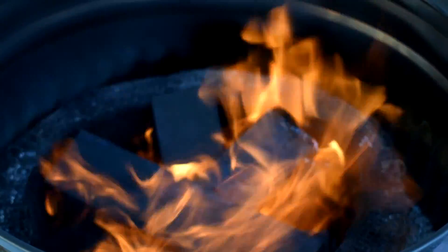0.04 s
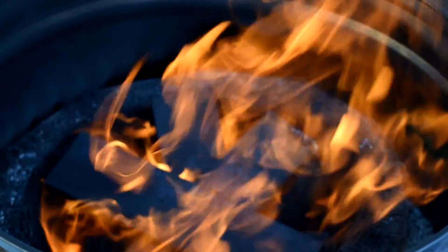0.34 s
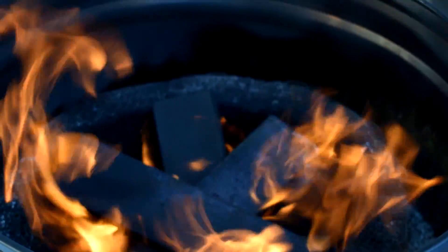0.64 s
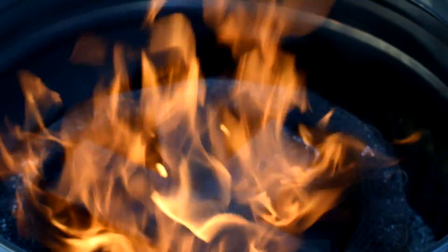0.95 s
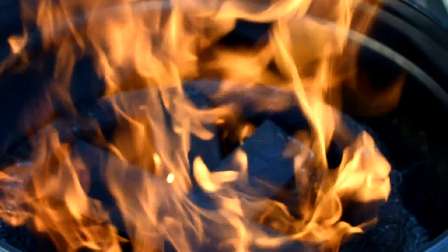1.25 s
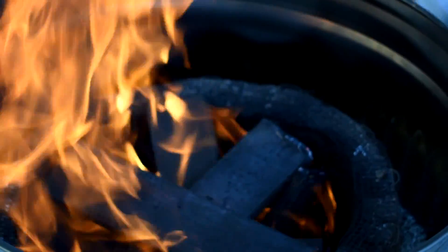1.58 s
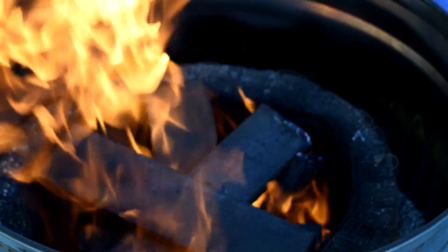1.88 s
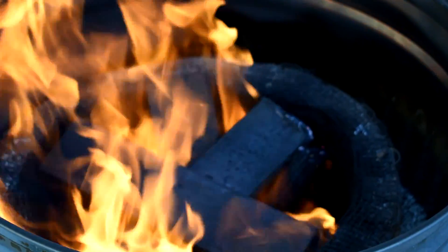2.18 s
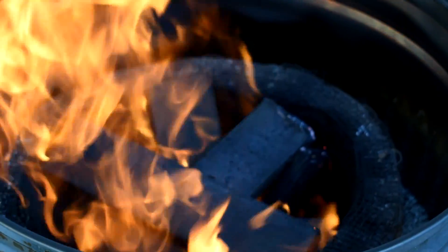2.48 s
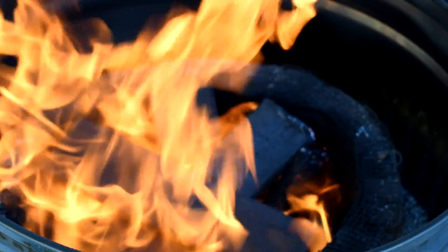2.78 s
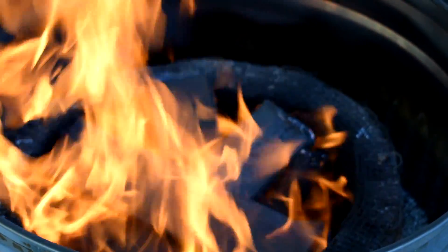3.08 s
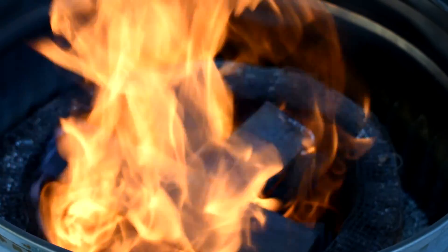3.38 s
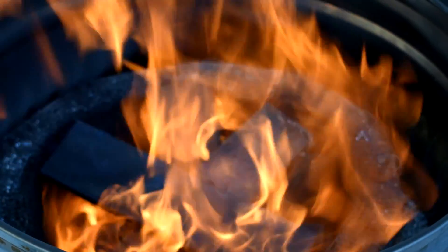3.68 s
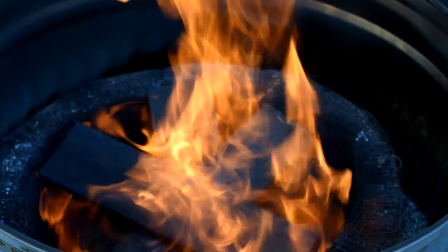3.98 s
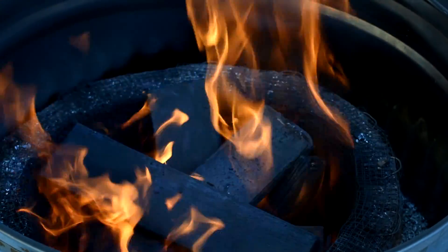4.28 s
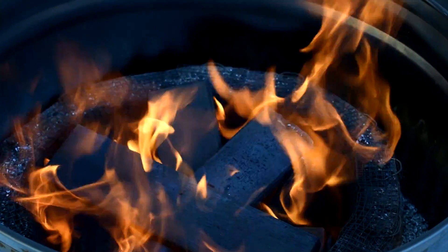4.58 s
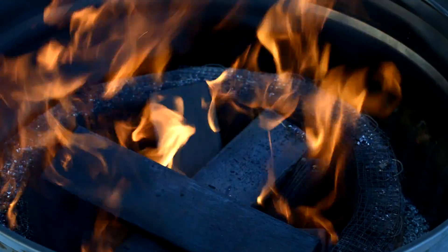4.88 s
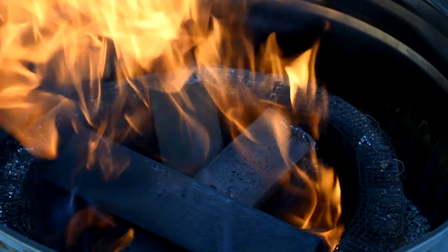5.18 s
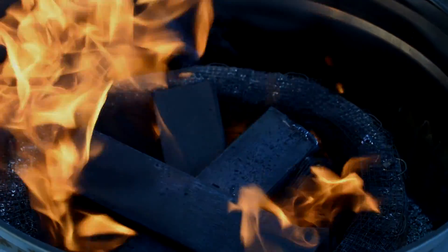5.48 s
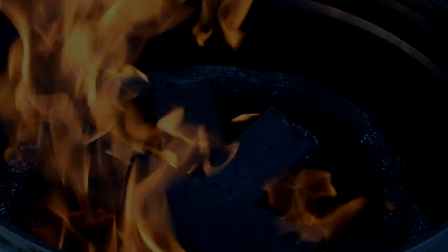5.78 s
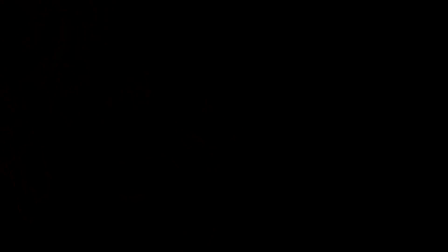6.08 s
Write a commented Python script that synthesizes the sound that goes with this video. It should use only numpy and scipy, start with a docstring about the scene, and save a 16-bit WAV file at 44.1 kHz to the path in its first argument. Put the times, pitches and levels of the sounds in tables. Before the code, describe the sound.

A close fire of coals rumbles and flutters softly inside a round metal furnace. Brittle crackles and snaps come at random over the flames, along with a thin hiss and small spits of gas. From about the middle on, a few pieces crack loudly with a brief hollow knock, the strongest near the end. The crackling spreads across the stereo field, and everything fades out at the close.

```python
"""Coals tick, snap and shed crumbs over a low rumble of flame: charcoal in an open metal furnace.
Each brittle fracture is an impulse coloured by the piece that broke, and the furnace wall scatters
it into a short, bright tail. The strongest cracks make whole blocks knock. Turbulent flames flutter
and flap; escaping gas hisses, spits, puffs and whistles thinly. The sound fades out at the end."""
import sys
import numpy as np
from scipy import signal
from scipy.fft import rfft, irfft, next_fast_len
from scipy.io import wavfile
from scipy.ndimage import map_coordinates

SR = 44100
rng = np.random.default_rng(int(sys.argv[2]) if len(sys.argv) > 2 else 0)


def materialize(psi):
    """Save the field psi as 16-bit PCM at rate SR to the path in sys.argv[1].

    A 1-D psi becomes a single channel; in a 2-D psi each row is a channel.
    """
    bounded = np.clip(np.atleast_2d(psi).T, -1, 1)
    quanta = np.round(bounded * 32767).astype(np.int16)
    wavfile.write(sys.argv[1], SR, quanta)


N = 275625
TIME_S = np.arange(N) / SR
TOP_HZ = 15750  # upper band limit


def amp(db):
    """Decibels to amplitude ratio."""
    return 10 ** (np.asarray(db) / 20)


def unit(x):
    """Normalisation to rms 1."""
    return x / np.sqrt(np.mean(x ** 2) + 1e-20)


def along(points, hz):
    """Interpolation of (frequency_hz, value) points on a logarithmic frequency axis."""
    knot_hz, values = np.transpose(points)
    return np.interp(np.log(hz + 1), np.log(knot_hz + 1), values)


def wobble(per_s):
    """Slow random modulation: a spline through per_s Gaussian values a second."""
    knots = rng.standard_normal(int(N * per_s / SR) + 4)
    return map_coordinates(knots, [TIME_S * per_s])


def filtered(x, response):
    """Linear filtering: the spectrum of x is multiplied by response(hz)."""
    size = next_fast_len(x.shape[-1] + 8192)
    hz = np.fft.rfftfreq(size, 1 / SR)
    return irfft(rfft(x, size) * response(hz), size)[..., :x.shape[-1]]


def minimum_phase(gain_db):
    """Causality: a response with these gains that rings only after the blow."""
    cepstrum = irfft(np.log(amp(gain_db)))
    half = cepstrum.shape[-1] // 2
    cepstrum[..., 1:half] *= 2
    cepstrum[..., half + 1:] = 0
    return np.exp(rfft(cepstrum))


# Likeness of left and right: frequency_hz, correlation
COHERENCE = [(200, 1), (450, 0.98), (800, 0.92), (1300, 0.73), (2000, 0.75), (3000, 0.94), (4500, 0.48),
             (5600, 0.22), (7500, -0.17), (12500, 0.16), (15000, -0.29)]
def spread(pair, hz):
    """Partial coherence: two independent spectra mix to stereo, alike in the bass, apart in the treble."""
    angle = np.arccos(np.clip(along(COHERENCE, hz), -1, 1)) / 2
    mid, side = pair[0] * np.cos(angle), pair[1] * np.sin(angle)
    return np.array([mid + side, mid - side])


def coloured_noise(spectrum):
    """Spectral shaping of white noise, in stereo at rms 1."""
    size = next_fast_len(N)
    hz = np.fft.rfftfreq(size, 1 / SR)
    white = spread(rfft(rng.standard_normal((2, size))), hz)
    return unit(irfft(white * amp(along(spectrum, hz)), size)[:, :N])


# Colour of the wall's reflections, also given to the gas spits: frequency_hz, gain_db
WALL_SPECTRUM = [(200, -14), (1000, -8.5), (3000, -0.5), (9000, 0.5), (12000, -5), (15000, -10.5)]
def furnace_wall(incident, t60_s=0.27, rise_s=0.00077, size=16384):
    """Reverberation: the round metal wall scatters each crack into a short, bright tail."""
    t = np.arange(size) / SR
    tail = filtered(rng.standard_normal((2, size)), lambda hz: amp(along(WALL_SPECTRUM, hz)))
    tail = tail * amp(-60 * t / t60_s) * (1 - np.exp(-t / rise_s))
    return signal.fftconvolve(incident, tail / np.linalg.norm(tail[0]), axes=1)[:, :N]


def gas_whistle(start_s=1.4, rise_s=0.6, level_db=-69.5, pitch_hz=14000, sag_hz_per_s=190, waver_hz=70):
    """Flow tone: gas sings in a slowly widening crack, a narrow noise band that wavers and sinks."""
    age_s = TIME_S - start_s
    swell = np.clip(age_s / rise_s, 0, 1)
    centre_hz = pitch_hz - sag_hz_per_s * age_s + waver_hz * wobble(8)
    phase = 2 * np.pi * np.cumsum(centre_hz) / SR
    band = np.array([wobble(450) * np.sin(phase) + wobble(450) * np.cos(phase) for _ in range(2)])
    return swell * amp(level_db + wobble(4.6)) * unit(band)


# Colour of the seeping gas: frequency_hz, density_db
HISS_SPECTRUM = [(300, -23), (1000, -3), (3000, -2.5), (5500, -0.5), (8000, 0), (11000, 0.5), (12500, 1.5),
                 (14000, 3), (16000, 2)]
# Strength of the gas flow, the base level for hiss and ticks: time_s, level_db
GAS_FLOW = [(0, -54), (1.5, -53.5), (1.7, -52.5), (2.05, -56), (2.33, -50.5), (2.5, -55), (3.05, -54),
            (3.25, -51.5), (3.62, -55), (4.05, -53), (5.3, -55), (5.7, -55.5)]
def gas_hiss(offset_db=-0.6, sputter_db=0.77, split_hz=7000):
    """Flow noise: gas seeps from hot coals, its coarse and fine hiss each wavering at its own pace."""
    flow_db = np.interp(TIME_S, *np.transpose(GAS_FLOW))
    hiss = coloured_noise(HISS_SPECTRUM)
    fine = filtered(hiss, lambda hz: hz ** 4 / (hz ** 4 + split_hz ** 4))
    coarse = hiss - fine
    seep = coarse * amp(1.7 * wobble(25)) + fine * amp(1.2 * wobble(21))
    return amp(flow_db + offset_db + sputter_db * wobble(340)) * seep


# Jets of gas from fresh cracks: start_s, level_db, t60_s
GAS_SPITS = [(1.69, -53, 0.15), (2.549, -53, 0.3), (4.193, -55, 0.076), (4.458, -52.5, 0.53),
             (4.503, -48, 0.026), (4.712, -48, 0.14), (5.36, -46, 0.22)]
def gas_spits(rise_s=0.0018):
    """Transient jet noise: gas rushes from a fresh crack and dies away exponentially."""
    envelope = np.zeros(N)
    for start_s, level_db, t60_s in GAS_SPITS:
        age_s = np.maximum(TIME_S - start_s, 0)
        envelope += amp(level_db - 60 * age_s / t60_s) * np.minimum(age_s / rise_s, 1)
    return envelope * coloured_noise(WALL_SPECTRUM)


# Colour of the body of the flames: frequency_hz, density_db
RUMBLE_SPECTRUM = [(20, -30), (48, -15), (62, -12.5), (80, 1), (130, 0.5), (175, -1), (260, -7.5),
                   (315, -4.5), (430, -17.5), (650, -26), (1000, -24), (1500, -54), (3000, -75)]
# Colour of the flame tips: frequency_hz, density_db
TIP_SPECTRUM = [(200, -39.5), (400, 3.5), (560, 4), (900, -2.5), (1250, -8.5), (1800, -13), (3000, -27)]
# Flapping sheets of flame: centre_s, level_db, width_s, tips_relative_db
FLAME_FLAPS = [(0.396, -42, 0.02, -13), (0.675, -41, 0.015, -11.5), (0.938, -37, 0.005, -27),
               (1.033, -46.5, 0.028, -6), (1.164, -44.5, 0.017, -25), (1.923, -39.5, 0.01, -6.5),
               (1.998, -40.5, 0.024, -7.5), (2.725, -41, 0.013, -11), (2.79, -46.5, 0.023, -23),
               (3.44, -45.5, 0.02, -5.5), (4.125, -39, 0.015, -17), (4.412, -40.5, 0.022, -12),
               (4.859, -40.5, 0.024, -27), (5.008, -46, 0.0092, -7), (5.169, -40, 0.012, -17),
               (5.29, -37.5, 0.0031, -25)]
def flames(rumble_db=-46, flutter_db=-60):
    """Turbulent combustion noise: flames rumble, their tips flutter, and now and then a sheet flaps."""
    flicker = wobble(22)  # one flicker moves both; the tips swing wider
    rumble = amp(rumble_db + 0.25 * flicker) * coloured_noise(RUMBLE_SPECTRUM)
    flutter = amp(flutter_db + 2.5 * flicker) * coloured_noise(TIP_SPECTRUM)
    centre_s, level_db, width_s, tips_db = np.transpose(FLAME_FLAPS)[:, :, None]
    swells = amp(level_db) * np.exp(-((TIME_S - centre_s) / width_s) ** 2 / 2)
    body_flaps = swells.sum(axis=0) * coloured_noise(RUMBLE_SPECTRUM)
    tip_flaps = (swells * amp(tips_db)).sum(axis=0) * coloured_noise(TIP_SPECTRUM)
    return rumble + flutter + body_flaps + tip_flaps


# Pockets of gas bursting or catching fire: centre_s, peak_db, width_s
GAS_PUFFS = [(3.1806, -31, 0.00015), (3.4164, -35.5, 0.0015), (4.126, -29.5, 0.00062),
             (4.4022, -41, 0.00092), (5.3346, -39, 0.00052)]
def gas_puffs():
    """Monopole radiation: a pocket of gas expands at once, giving one push of air, then one pull."""
    centre_s, peak_db, width_s = np.transpose(GAS_PUFFS)[:, :, None]
    widths = np.clip((TIME_S - centre_s) / width_s, -10, 10)
    return np.sum(-amp(peak_db) * widths * np.exp((1 - widths ** 2) / 2), axis=0)


# Whole blocks shaken as they crack: start_s, pitch_hz, level_db, t60_s
BLOCK_KNOCKS = [(2.5326, 2100, -20.5, 0.0019), (3.1806, 880, -32, 0.0036), (4.4376, 2380, -35, 0.003),
                (5.3344, 1290, -19, 0.007), (5.3578, 3520, -32, 0.018)]
def block_knocks():
    """Damped free vibration: a strong crack sets the whole block ringing in a short, hollow knock."""
    start_s, pitch_hz, level_db, t60_s = np.transpose(BLOCK_KNOCKS)[:, :, None]
    age_s = np.clip(TIME_S - start_s, 0, 2 * t60_s)
    return np.sum(amp(level_db - 60 * age_s / t60_s) * np.sin(2 * np.pi * pitch_hz * age_s), axis=0)


# Colour common to all breaking coal: frequency_hz, density_db
SNAP_SPECTRUM = [(30, -37.5), (100, 4), (400, -3), (700, 2.5), (1150, 3.5), (2000, 4), (3500, -3.5),
                 (5500, -4.5), (7500, -4), (11000, -4.5), (13000, -4.5), (16000, -4)]
def coal_response(hz, tilt_db_per_octave, ring_hz, ring_db, ring_octaves, uneven_db):
    """Resonant filtering: each piece has a spectral tilt, one ring, and random peaks and dips."""
    octaves = np.log2(np.maximum(hz, 1000) / ring_hz)
    tilt_db = tilt_db_per_octave * np.minimum(octaves, np.log2(11400 / ring_hz))  # flat above 11.4 kHz
    resonance_db = ring_db * np.exp(-(octaves / ring_octaves) ** 2)
    knot_hz = np.linspace(0, SR / 2, 28)
    ripple = np.array([np.interp(hz, knot_hz, row) for row in rng.standard_normal((len(ring_hz), 28))])
    colour = minimum_phase(along(SNAP_SPECTRUM, hz) + uneven_db * ripple + tilt_db + resonance_db)
    lowpass = np.clip((TOP_HZ - hz) / 1000 + 1, 0, 1)
    delay_s = 0.00012 * hz / TOP_HZ  # the treble rattles in the pores and leaves a little later
    return colour * lowpass * np.exp(-1j * np.pi * hz * delay_s)


# Thinner colour of small crumbs, relative to the snap: frequency_hz, gain_db
CRUMB_SPECTRUM = [(200, -29), (700, 7), (2000, -5), (5000, 1.5), (9000, 0), (15000, -4)]
def fractures(rows, snap_t60_s, crumb_t60_s, ring_octaves, spike, uneven_db, size):
    """Brittle fracture: a snap, then a shower of crumbs. Returns direct and wall-bound sound."""
    start_s, level_db, tilt, ring_hz, ring_db, crumb_db, side, wall_db = np.transpose(rows)[:, :, None]
    t, hz = np.arange(size) / SR, np.fft.rfftfreq(size, 1 / SR)
    colour = coal_response(hz, tilt, ring_hz, ring_db, ring_octaves, uneven_db)
    nearness = np.array([side, -side]) / 2  # the nearer channel is earlier and louder
    lead = np.exp(2j * np.pi * hz * 0.00005 * nearness)
    gain = amp(level_db + 1.5 * nearness)
    margin = 16  # samples of room for that lead

    def radiate(force, shade):
        """Source and filter: force through the coal, scaled to the energy of 1 ms at rms 1."""
        spectrum = spread(rfft(np.roll(force, margin, axis=-1)), hz)
        pressure = irfft(spectrum * colour * shade * lead)
        return pressure / np.sqrt(np.sum(pressure ** 2, axis=2, keepdims=True) / (SR / 1000))

    snap, crumbs, crumb_sizes = rng.standard_normal((len(rows), 3, 2, size)).transpose(1, 2, 0, 3)
    snap = snap * amp(-60 * t / snap_t60_s)
    snap[0, :, 0] += spike  # the first break is one clean push
    shower = amp(-60 * t / crumb_t60_s) * (1 - np.exp(-t / 0.0019))
    crumbs = crumbs * amp(2.5 * crumb_sizes) * shower
    cracks = gain * (radiate(snap, 1) + amp(crumb_db) * radiate(crumbs, amp(along(CRUMB_SPECTRUM, hz))))
    paths = np.zeros((2, 2, N + size))
    for k, start in enumerate(np.clip(start_s[:, 0] * SR - margin, 0, N - 1).astype(int)):
        paths[..., start:start + size] += np.array([cracks[:, k], amp(wall_db[k]) * cracks[:, k]])
    return paths[..., :N]


def ember_ticks(count=280, lowest_hz=3120, span_octaves=2.46, ring_db=6, wall_db=-8.5):
    """Shot noise: tiny dry fractures at random moments, most faint, louder where more gas escapes."""
    when, chance, pitch, place = rng.random((count, 4)).T
    tilt_scatter, crumb_scatter = rng.standard_normal((count, 2)).T
    start_s = when * N / SR
    excess_db = 0.5 + np.minimum(-2.5 * np.log(1 - chance), 10)  # capped exponential distribution
    level_db = np.interp(start_s, *np.transpose(GAS_FLOW)) + excess_db
    tilt = np.maximum(6 + 6 * tilt_scatter, 0)
    ring_hz = lowest_hz * 2 ** (span_octaves * pitch)
    crumb_db = -2 + 3 * crumb_scatter
    side = 2 * place - 1
    columns = np.broadcast_arrays(start_s, level_db, tilt, ring_hz, ring_db, crumb_db, side, wall_db)
    return fractures(np.transpose(columns), snap_t60_s=0.003, crumb_t60_s=0.03,
                     ring_octaves=0.4, spike=4, uneven_db=3.5, size=1024)


# Coals cracking: start_s, level_db, tilt_db_per_octave, ring_hz, ring_db, crumbs_relative_db,
# side (positive is left), wall_relative_db
COAL_POPS = [(0.2416, -38.5, 12, 1400.0, 11.5, -14, 0.63, -13),
             (0.2895, -38, 11.5, 8950, 5, -10, -0.59, -19), (0.3327, -39, 7, 6220.0, 4, -4, 0.27, -21),
             (0.5076, -43.5, 3.5, 2170, 4, 3, 0.87, -11), (0.5463, -32.5, 8.5, 1400.0, 5, -8, -0.64, -24),
             (0.7154, -29, 7, 7950, 8, -15, -1.13, -21), (0.7582, -43, 11, 4740.0, 0, 3, 0.45, -15),
             (0.8329, -27, 8.5, 2740, 2.5, -8, -0.094, -29), (1.0132, -35.5, 11, 8200, 9, -7, -0.13, -12),
             (1.1572, -43, 4.5, 3120, 11, -1, -0.4, -18), (1.1663, -42, 8, 9000, 6, -4, 0.63, -11),
             (1.3792, -35, 6.5, 4530, 1.5, 1.5, -0.062, -18), (1.4157, -44, 8, 10000, 4, -5, -0.3, -16),
             (1.4326, -42, 9, 11000, 4, -2, 0.48, -16), (1.4597, -37.5, 9.5, 8250, 2, -5, 0.56, -9),
             (1.5748, -38.5, -3, 14500.0, 3, -8, 0.89, -5), (1.6266, -30.5, 3, 4900.0, 8, -9, -0.66, -11.5),
             (1.6484, -40.5, 2, 6010.0, 5, -14, -0.1, -18),
             (1.6795, -44.5, 0.5, 13100.0, 10, 0, -0.82, -16),
             (1.6976, -44.5, 0.5, 4140.0, 14, 1, -0.0, -13), (1.7584, -44.5, 4, 9000, -5, 0, 0.2, -14),
             (1.7784, -44, 2.5, 5960, 8, 3, -0.77, -11), (1.81, -42, 7, 8300, 23, -7, -0.13, -24),
             (1.8777, -39.5, 12, 1450.0, 5, -3, -0.51, -10), (1.8815, -49, 4, 3900, 16, -5, 0, -18),
             (1.9335, -46, 3, 4400, 15, -3, 0, -14), (1.9485, -48, 9, 12000, 1, 3, 0.68, -18),
             (2.0379, -39, 8.5, 1390, 16, -12, 0.77, -13), (2.0797, -43, 2, 11000, 4, -5, -0.44, -10),
             (2.1822, -43, 2.5, 3160, 11, 3.5, 0.0, -30), (2.1899, -42.5, 3, 13000, 12, 3.5, 0.2, -20),
             (2.2228, -39, 7, 7620.0, 4, -1, 0.54, -24), (2.2872, -44, 4, 6000, 2, 2, -0.53, -17),
             (2.3537, -47.5, 4, 2660.0, 9, 2.5, -0.39, -29), (2.361, -43.5, 11, 10000, 8, -2, 0.2, -21),
             (2.4289, -46, 4, 4200, 5, -3, -0.25, -20), (2.5327, -14.5, 4, 14500, -0.5, -6.5, -1, -16.5),
             (2.5998, -42, 8, 9990.0, 10, -13.0, -1.1, -16), (2.6579, -45, 5, 10000, -4, -1, 0.54, -16),
             (2.7308, -39.5, 4, 12240.0, 10.5, 0.5, -0.3, -19), (2.7886, -44, 2, 12000, 5, -5, 0.56, -18),
             (2.8059, -42.5, -0.5, 8500, 10, -1, -0.0069, -16),
             (2.8166, -34.5, 5.5, 8430.0, 9, -10, -1.16, -28),
             (2.8444, -42.5, 5, 4430.0, 14, -10, 0.36, -7), (2.9974, -46, 10, 13100.0, 21, -9, -0.3, -14),
             (3.1526, -42.5, -2, 4220, 14, -3, -0.18, -18), (3.1802, -25.5, 0.5, 13300, 8.5, -1, 0.24, -11),
             (3.3644, -48, 4.5, 4740.0, 2, 7.5, 0.87, -4), (3.4094, -38, 5.5, 9500, -2, -2.5, 0.57, -12),
             (3.5122, -39.5, 7, 1400.0, 22.5, -6, 0.3, -16), (3.68, -48, 7, 9000, 4, -4, 0.23, -18),
             (3.7193, -30, 3.5, 5600, 9.5, -9, -0.57, -12), (3.8316, -44, 9, 1400.0, 18, 4, 0.85, -8),
             (3.8726, -37.5, 6.5, 2150, 9, 0, -0.64, -22), (4.0229, -33.5, 0, 6010.0, 2, -1.5, 1.3, -26),
             (4.0652, -36, 8, 1400.0, 13, -8, -0.81, -16), (4.179, -36.5, 9, 1720.0, 8, 0, 0.41, -8),
             (4.1929, -38, 3.5, 4240, 15, 0, -0.04, -23), (4.2393, -43.5, 7, 10000, 4, 0, 0.2, -22),
             (4.4189, -44.5, -6, 3620.0, 23, -1, -0.96, -11),
             (4.4377, -12.5, 5, 8300, 5, -12.5, -0.034, -21),
             (4.4939, -39, -1.5, 5810.0, 6.5, -5, 0.41, -18), (4.5042, -40.5, 17, 3980, 10, 8, 0.029, -19),
             (4.5241, -31.5, 7, 3740.0, 4, -1, 1.3, -17), (4.6452, -31, 2, 10400, 6.5, 2, 2.1, -16),
             (4.7105, -30, 6.5, 4140.0, 2, 2, 0.59, -14), (4.7251, -34.5, 5, 6880.0, 8, -3, -0.61, -23),
             (4.7579, -43, 6, 9990.0, 18, 2, -0.76, -16), (4.8349, -40.5, 12, 1390, 10, 2, -0.72, -23),
             (4.9447, -45, 8, 8000, -9, -5, 0, -16), (5.0808, -41, 0.5, 3700, 8.5, 0, -0.59, -20),
             (5.1896, -43, 7.5, 1890, 13, 1.5, 1.1, -4), (5.3348, -10.5, 4, 10800, 5.5, -6, 0.61, -13.5),
             (5.3578, -22.5, 1.5, 2120, 6, -10, -0.2, -18), (5.5433, -48, 9, 12000, 4, -11, 0.45, -18),
             (5.5676, -29.5, 5, 12240.0, 5.5, -4.5, 0.46, -13), (5.6663, -43, 2, 3720, 6, 1, -0.22, -5),
             (5.7228, -29, 6.5, 8400, 3, -5.5, -0.98, -15), (5.8187, -42, 6.5, 4060, 19, -6, 0.21, -15.5),
             (5.8411, -48, 11, 12000, 7, -5, 0.38, -18), (5.8895, -45, 2.5, 2010, 12, 1, 0, -11),
             (5.919, -44, 6, 4900.0, 6, 3.5, -0.52, -13), (6.0541, -44, 9, 11000, 0, 1, 0.76, -7),
             (6.1242, -32, 9.5, 5500, 4, 1, 0.92, -7), (6.2228, -31, 8, 7000, 9.5, -3, 0.49, -27)]
def coal_pops():
    """Impulse excitation: each larger fracture pops sharply and briefly rings the piece that broke."""
    return fractures(COAL_POPS, snap_t60_s=0.0057, crumb_t60_s=0.024,
                     ring_octaves=0.3, spike=8, uneven_db=0.7, size=2048)


def scene():
    """Superposition: crackling coals and their reflections add to the flames and the escaping gas."""
    crackle, on_wall = coal_pops() + ember_ticks()
    fire = crackle + furnace_wall(on_wall) + flames() + block_knocks()
    return fire + gas_puffs() + gas_hiss() + gas_spits() + gas_whistle()


def record(dry, ceiling=0.95, fade_start_s=5.664, fade_end_s=6.288):
    """Soft saturation rounds the highest peaks; a closing fade and a low-pass band limit follow."""
    rounded = dry / (1 + (dry / ceiling) ** 4) ** 0.25
    fade = np.interp(TIME_S, [fade_start_s, fade_end_s], [1, 0])
    return filtered(rounded * fade, lambda hz: np.clip((TOP_HZ - hz) / 400 + 0.5, 0, 1))


dry = scene()
out = record(dry)
materialize(out)
```